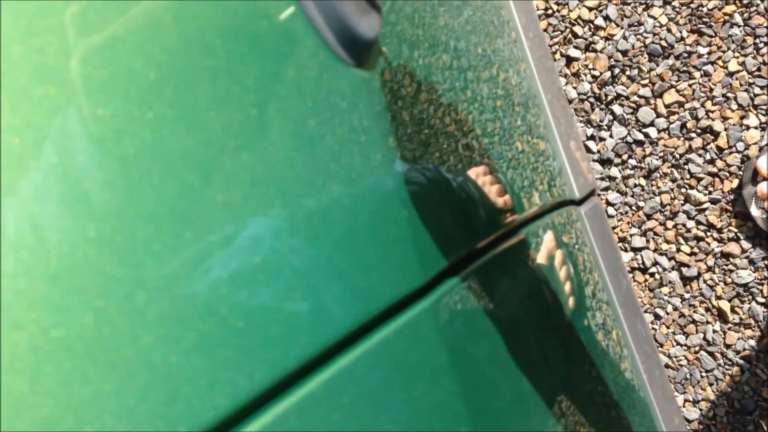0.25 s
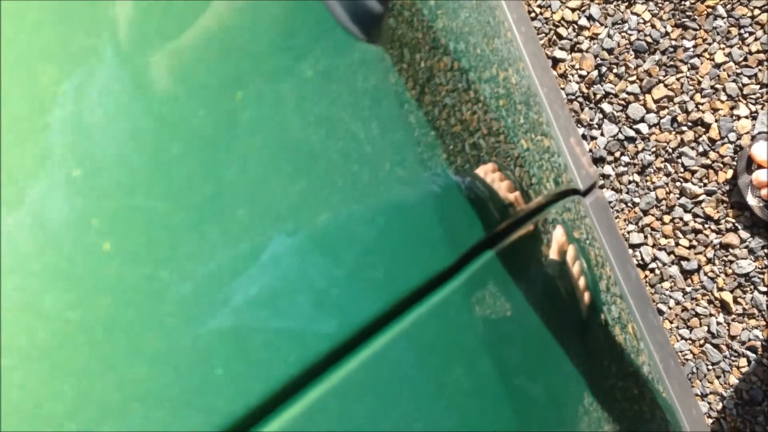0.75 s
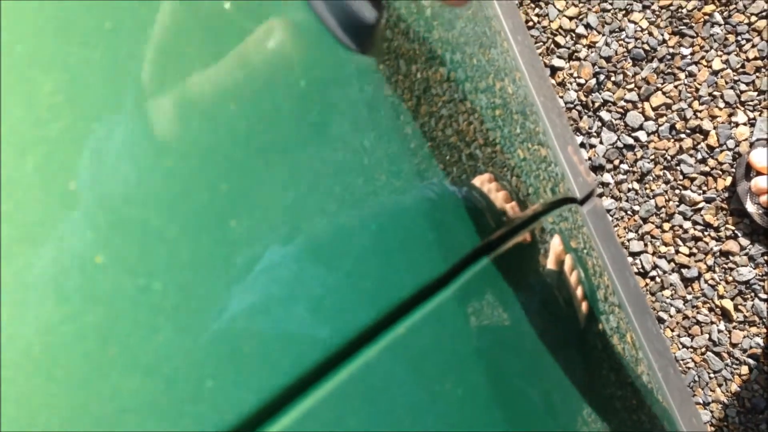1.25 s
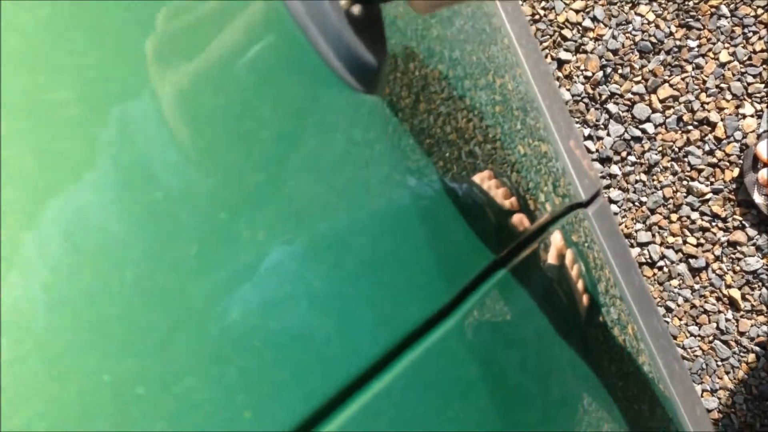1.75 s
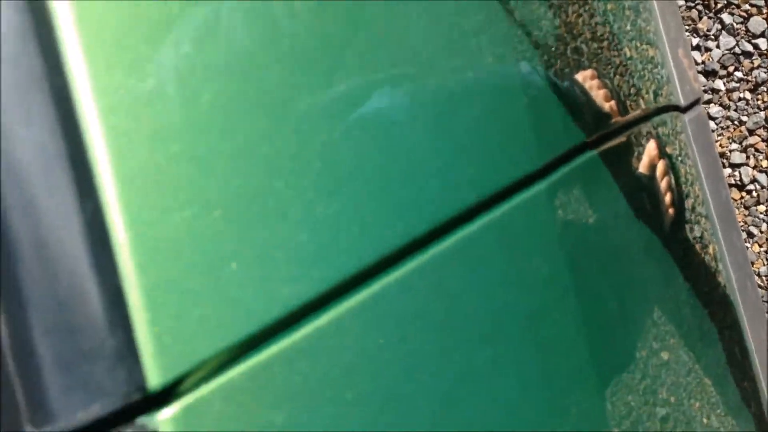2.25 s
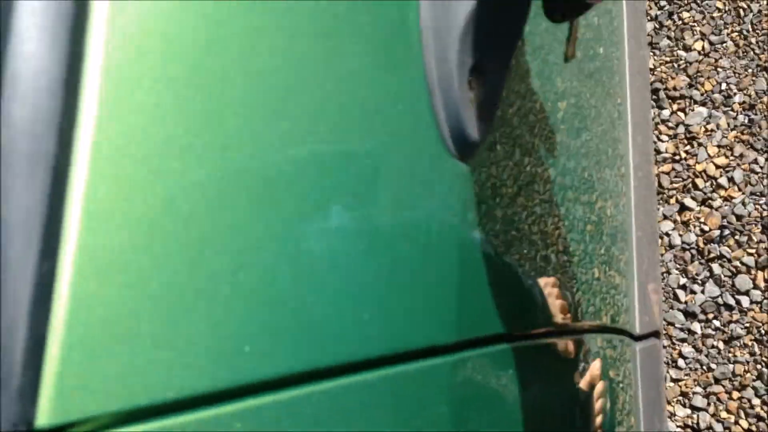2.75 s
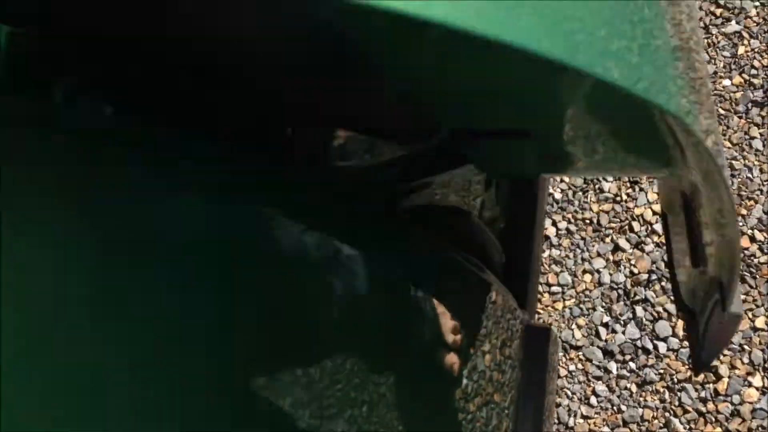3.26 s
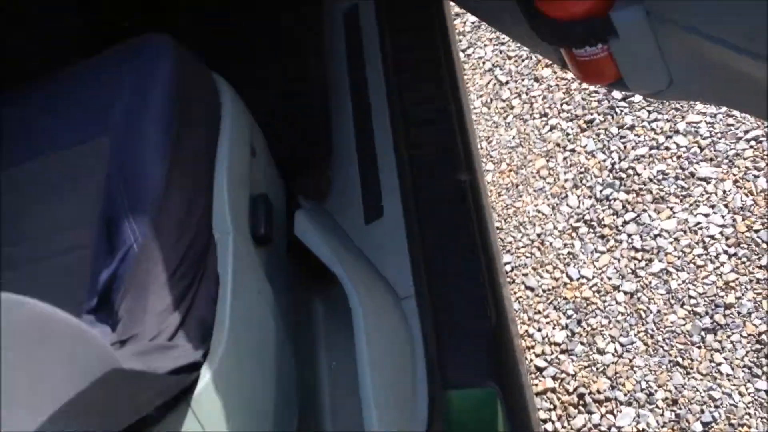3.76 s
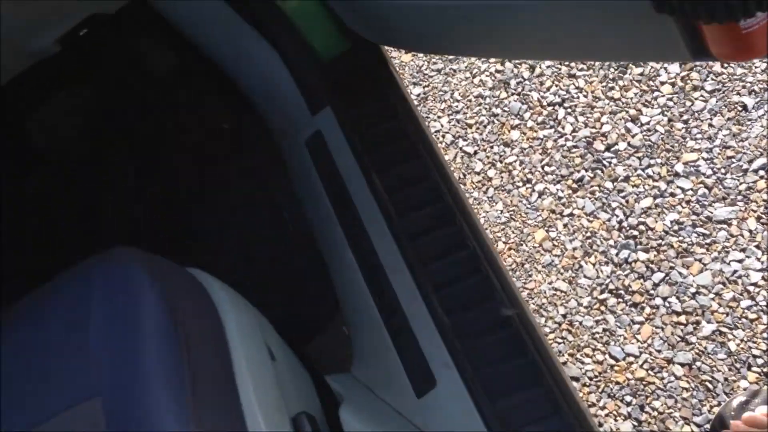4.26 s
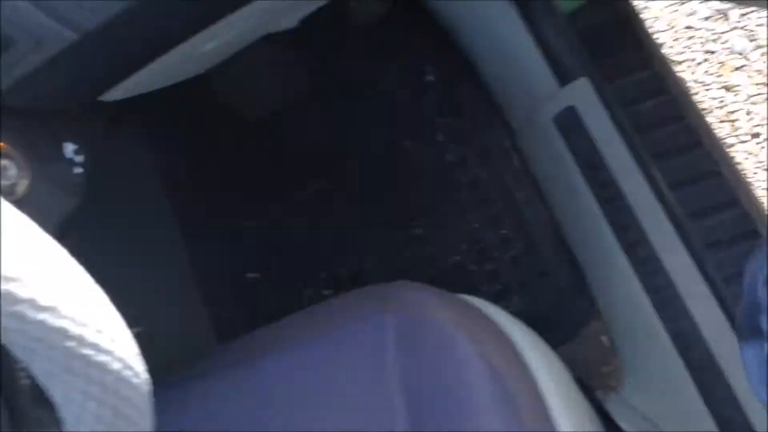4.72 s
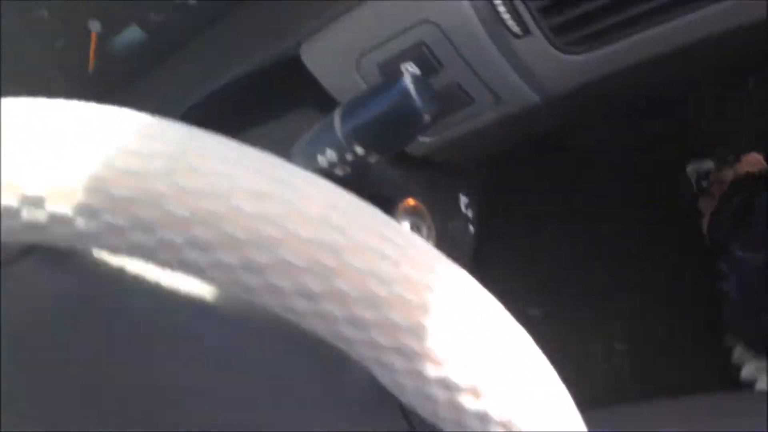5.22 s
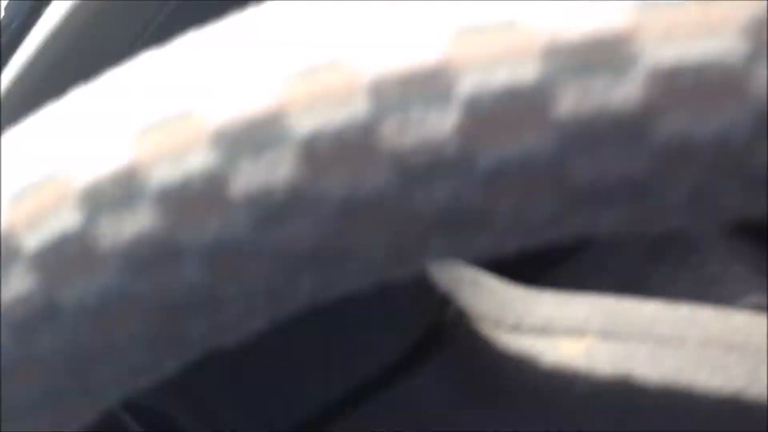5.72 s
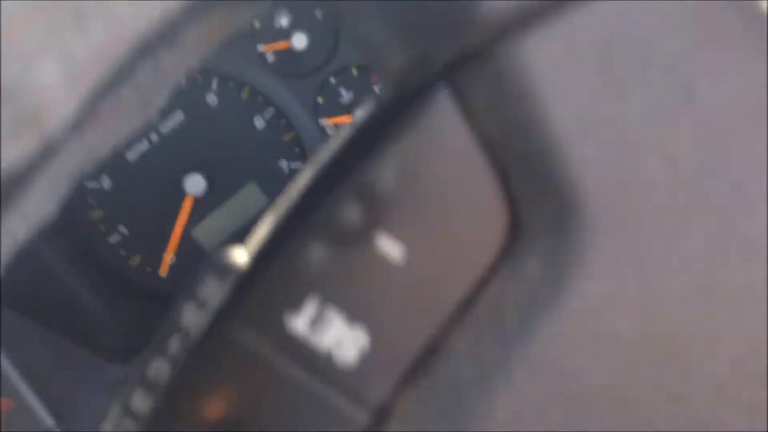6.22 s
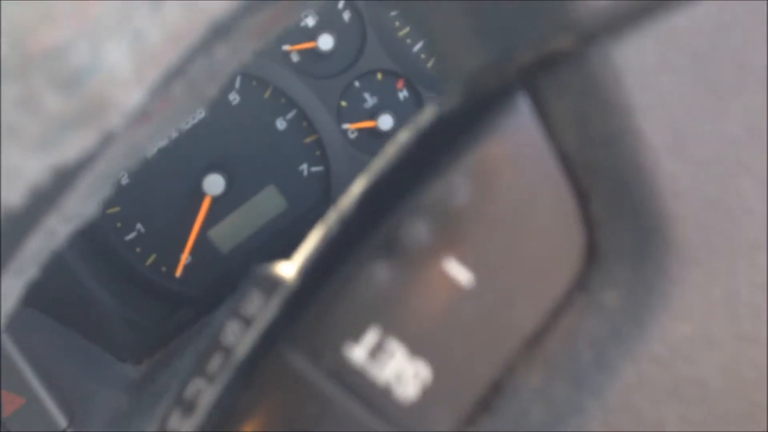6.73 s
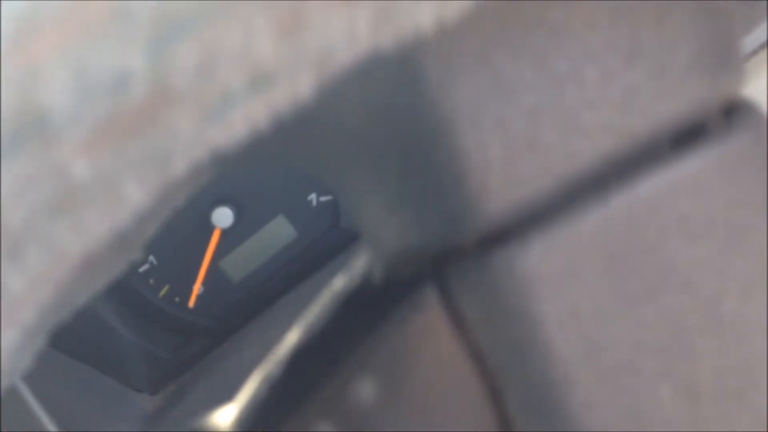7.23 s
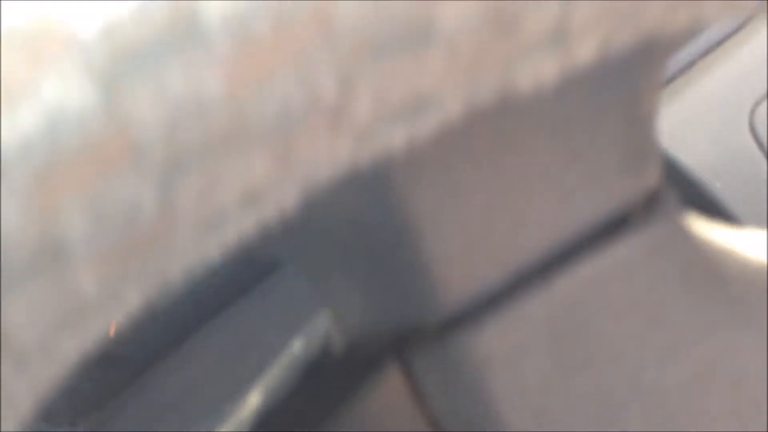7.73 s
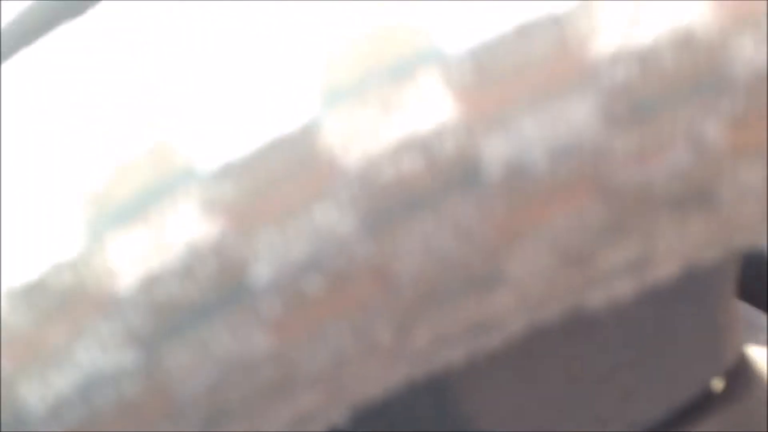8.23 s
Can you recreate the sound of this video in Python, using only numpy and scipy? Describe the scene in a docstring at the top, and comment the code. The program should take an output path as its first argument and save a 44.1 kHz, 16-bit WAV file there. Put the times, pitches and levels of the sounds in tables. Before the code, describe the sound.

A key grinds and clicks in a car door lock, the latch releases with a heavy thump, then clothes rustle and hollow plastic knocks inside.

```python
"""A car door lock close to the microphone: a key grinds and clicks, its ring jangling, in a small car outdoors.
The handle is pulled and the latch lets the door go with a heavy thump; its stay rasps as it swings.
Someone slides onto the seat with rustling clothes and soft thuds; hollow plastic knocks follow in the cabin.
Blows excite ringing modes and coloured noise bursts, and sliding is stick-slip clicks over hiss;
behind them lie a distant outdoor rumble and a smooth hiss, quieter inside the cabin."""
import sys
import numpy as np
from scipy import signal
from scipy.fft import rfft, irfft
from scipy.io import wavfile
from scipy.ndimage import uniform_filter1d, map_coordinates

SR = 44100
rng = np.random.default_rng(int(sys.argv[2]) if len(sys.argv) > 2 else 0)


def unload_audio(sound):
    """Save the sound as a 16-bit wav file, at the path given as the first command line argument."""
    columns = np.transpose(np.atleast_2d(sound))
    # keep every value between -1 and 1, then stretch to whole-number steps
    steps = np.round(np.clip(columns, -1, 1) * 32767)
    wavfile.write(sys.argv[1], SR, steps.astype(np.int16))


N = 373968
TOP_HZ = 15400  # upper limit of the recorder


def undb(db):
    """Turn dB into an amplitude factor."""
    return 10 ** (np.asarray(db) / 20)


def clock(seconds):
    """Sample times from zero, in seconds."""
    return np.arange(int(seconds * SR)) / SR


def unit(x):
    """Scale to unit energy."""
    return x / np.sqrt(np.sum(x ** 2) + 1e-18)


def level(x, db, size=220):
    """Bring the loudest stretch of `size` samples to an RMS level in dB."""
    loudest = uniform_filter1d(x ** 2, size).max()
    return x * undb(db) / np.sqrt(loudest + 1e-18)


def add(track, s, x):
    """Mix a sound in at a time in seconds."""
    i = max(int(s * SR), 0)
    track[i:i + len(x)] += x[:max(N - i, 0)]


def colour(x, points, size=4096):
    """Causal minimum-phase filter through (Hz, dB) points."""
    hz, db = np.transpose(points)
    f = np.maximum(np.arange(size // 2 + 1) * SR / size, 1)
    gain_db = np.interp(np.log(f), np.log(hz), db)
    # folding the cepstrum onto positive times makes the filter causal
    cepstrum = irfft(np.log(undb(gain_db)))
    cepstrum[1:size // 2] *= 2
    cepstrum[size // 2 + 1:] = 0
    response = irfft(np.exp(rfft(cepstrum)))
    return signal.fftconvolve(x, response)[:len(x)]


def high_pass(x, hz):
    """Remove what lies below a frequency."""
    return signal.sosfilt(signal.butter(3, hz, "high", fs=SR, output="sos"), x)


def fade(t, t60):
    """Exponential decay that falls 60 dB in t60 seconds."""
    return np.exp(-np.log(1000) * t / t60)


def burst(t, crack_t60, tail_t60, tail_db):
    """A sharp contact and the diffuse tail after it; tail_db is the tail's energy against the crack's."""
    crack = unit(rng.standard_normal(len(t)) * fade(t, crack_t60))
    tail = unit(rng.standard_normal(len(t)) * fade(t, tail_t60))
    return crack + undb(tail_db) * tail


def ring(t, modes, patchy_db, detune=0):
    """Decaying modes; each contact point weights them differently."""
    hz, db, t60 = np.transpose(modes)[:, :, None]
    weight, shift = rng.standard_normal((2, len(modes), 1))
    sign = (-1) ** np.arange(len(modes))[:, None]
    strength = sign * undb(db + patchy_db * weight)
    swing = np.sin(2 * np.pi * hz * (1 + detune * shift) * t)
    return unit(np.sum(strength * fade(t, t60) * swing, axis=0))


def push(x, ms):
    """A soft contact spreads a blow over a half sine and dulls it."""
    t = clock(max(ms, .2) / 1000)
    return signal.fftconvolve(x, np.sin(np.pi * t / t[-1]))[:len(x)]


def friction(rise, fall, slips_per_s, slip_db, judder_db):
    """Uneven stick-slip clicks over fine hiss; the swell is 20 dB down `rise` s before and `fall` s after its peak."""
    t = clock(2 * (rise + fall)) - 2 * rise
    swell = 10 ** -(np.abs(t / np.where(t < 0, rise, fall)) ** 1.6)
    slips = (rng.random(len(t)) < slips_per_s / SR) * rng.standard_normal(len(t))
    # the grip tightens and eases every few milliseconds
    grips = np.arange(t[0], t[-1], .005)
    judder = undb(judder_db * np.interp(t, grips, rng.uniform(-1, 1, len(grips))))
    hiss = unit(rng.standard_normal(len(t)))
    return swell * judder * (hiss + undb(slip_db) * unit(slips))


def wander(x, share=.1, every_s=.018):
    """Let the pitch of a sound drift at random."""
    turns = np.arange(0, len(x), every_s * SR)
    speed = 1 + share * np.interp(np.arange(len(x)), turns, rng.uniform(-0.84, 1, len(turns)))
    return map_coordinates(x, [np.cumsum(speed / speed.mean())])


# Tint of the open air. Each row: frequency in Hz, gain in dB.
AIR_TINT = [(15, -54), (25, -15), (64, -5.5), (173, -5), (227, -9), (445, -19), (1110, -26), (3090, -25.5),
            (15500, -36.5)]
# Background, quieter inside the cabin. Each row: time in seconds, low rumble in dB, hiss in dB.
AMBIENCE_LEVELS = [(0, -56.5, -61.5), (4.1, -55, -58.5), (5.3, -60.5, -58.5), (7.0, -63.5, -65)]


def air():
    """Distant outdoor rumble and a smooth hiss: one coloured noise split at 500 Hz."""
    s, low_db, hiss_db = np.transpose(AMBIENCE_LEVELS)
    noise = colour(rng.standard_normal(N), AIR_TINT)
    low = signal.sosfiltfilt(signal.butter(2, 500, fs=SR, output="sos"), noise)
    hiss = noise - low
    t = np.arange(N) / SR
    rumble = low / low.std() * undb(np.interp(t, s, low_db))
    return rumble + hiss / hiss.std() * undb(np.interp(t, s, hiss_db))


# Low tint of a shifting body. Each row: frequency in Hz, gain in dB.
SHUFFLE_TINT = [(30, -4.5), (70, -7), (170, 1.5), (330, -8.5), (550, -14), (2500, -38)]
# A body shifting against door and seat. Each row: peak in seconds, length in seconds, level in dB.
SHUFFLE_STROKES = [(2.115, 0.11, -46.5), (3.552, 0.11, -44), (3.829, 0.2, -39.5), (3.968, 0.07, -39.5),
                   (4.307, 0.081, -54), (5.412, 0.089, -48), (5.656, .14, -47.5), (5.863, 0.11, -40),
                   (5.992, 0.19, -43.5)]


def shuffles():
    """A body shifting its weight drags in sparse, low slips."""
    out = np.zeros(N)
    for s, length, db in SHUFFLE_STROKES:
        slide = friction(length / 2, length / 2, slips_per_s=98, slip_db=-0.5, judder_db=2.5)
        add(out, s - length, level(colour(slide, SHUFFLE_TINT), db, size=600))
    return out


# Sill and floor pan. Each row: frequency in Hz, level in dB, 60 dB decay in seconds.
FLOOR_MODES = [(120, -1, 0.09), (161.4, -0.5, 0.088), (322.7, -2.5, 0.091), (494, -2, 0.077),
               (718, -6.5, 0.08)]
# Dull tint of the padding. Each row: frequency in Hz, gain in dB.
THUD_TINT = [(25, -12), (140, 2), (300, -6), (700, 3), (1200, -2.5), (4000, -78)]
# Weight landing on sill, floor and seat. Each row: start in seconds, level in dB, contact in ms.
THUD_BLOWS = [(3.567, -24, 2.77), (3.588, -31, 2.1), (3.764, -34.5, 1.33), (3.788, -31.5, 3.53),
              (3.83, -39, 1.3), (3.891, -36, 2.1), (3.929, -29, 1.34), (4.32, -41, 10), (4.653, -44.5, 2.7),
              (5.382, -36.5, 2.6), (5.456, -42, 3.8), (5.607, -39.5, 3.3), (5.842, -33.5, 3.3),
              (5.932, -39.5, 3.2), (6.045, -44, 2.8), (6.363, -46, 4.6)]


def thuds():
    """Weight lands softly: floor modes and padding noise, blurred by the contact time."""
    out, t = np.zeros(N), clock(.3)
    for s, db, ms in THUD_BLOWS:
        # padding gives way gradually under the weight
        give = 1 - np.exp(-t / 0.0035)
        padding = unit(colour(give * burst(t, 0.046, 0.33, -23.0), THUD_TINT))
        floor = ring(t, FLOOR_MODES, patchy_db=4.5, detune=0.071)
        add(out, s, level(push(floor + undb(-0.5) * padding, ms), db, size=300))
    return out


CREAK_HZ, CREAK_JITTER = 600.5, 0.086  # rate of the slips in a knock, and their unevenness as a share


def creak(seconds, count):
    """A short run of uneven slips that ends as the contact comes to rest."""
    gaps = (1 + CREAK_JITTER * rng.standard_normal(count)) / CREAK_HZ
    times = np.cumsum(gaps) - gaps[0]
    strength = np.exp(-(times / seconds) ** 4)
    return np.bincount(np.abs(times * SR).astype(int), strength)


# Hollow trim. Each row: frequency in Hz, level in dB, 60 dB decay in seconds.
TRIM_MODES = [(593.5, 5.5, 0.047), (702, -2.5, 0.091), (807, 4, 0.03), (940, 2.5, 0.062),
              (1114, -5.5, 0.055)]
# Stiff edge of the trim. Each row: frequency in Hz, level in dB, 60 dB decay in seconds.
EDGE_MODES = [(2194, -3.5, 0.098), (2746, 1, 0.04), (3235, 3.5, 0.048)]
# Bright tint of a hard edge. Each row: frequency in Hz, gain in dB.
EDGE_TINT = [(300, -8.5), (750, 0.5), (1020, 5), (1700, -1), (2300, -5), (3200, -5), (4000, -9.5),
             (5200, -13), (9000, -16.5), (15000, -36)]
# Knocks in the cabin. Each row: start in seconds, hollow ring in dB, clatter in dB, drag in ms.
TRIM_KNOCKS = [(5.38, -51, -42, 3), (5.448, -44.5, -38.5, 1.5), (5.61, -50, -36, 1.1),
               (6.604, -47, -48, 2.6), (7.3735, -30, -37, 2.2), (7.385, -37, -49.5, 3.4),
               (7.451, -52.5, -69, 13), (7.719, -45.5, -59, 2.2), (7.756, -43, -50.5, 2),
               (7.84, -30, -54.5, 2.5), (7.877, -40, -64, 19), (7.901, -27, -44, 12.2),
               (7.942, -48, -68, 9.2), (7.962, -35.5, -52.5, 5.4), (8.167, -66, -38, 1.05),
               (8.465, -58, -41.5, 5)]


def knocks():
    """Creaky slips strike hollow plastic trim: its cavity rings while its edge clatters."""
    out, t = np.zeros(N), clock(.12)
    for s, hollow_db, clatter_db, drag_ms in TRIM_KNOCKS:
        slips = creak(drag_ms / 1000, count=16)
        hollow = signal.fftconvolve(slips, ring(t, TRIM_MODES, patchy_db=4, detune=0.024))
        add(out, s, level(hollow, hollow_db))
        chatter = signal.fftconvolve(slips, fade(t, 0.015) + undb(-5) * fade(t, 0.083))
        clatter = unit(colour(chatter * rng.standard_normal(len(chatter)), EDGE_TINT))
        edge = unit(signal.fftconvolve(slips, ring(t, EDGE_MODES, patchy_db=-3.5, detune=0.024)))
        add(out, s, level(clatter + undb(-5.5) * edge, clatter_db, size=130))
    return out


# A key on metal. Each row: frequency in Hz, level in dB, 60 dB decay in seconds.
CLINK_MODES = [(3920, 1, 0.051), (4064, -9.5, .1), (5770, -10.5, 0.062)]
# Clinks by the steering column. Each row: start in seconds, level in dB.
KEY_CLINKS = [(6.6051, -46), (6.618, -54)]


def clinks():
    """A key clinks on metal by the steering column: a few clear modes and a faint click."""
    out, t = np.zeros(N), clock(.12)
    for s, db in KEY_CLINKS:
        modes = ring(t, CLINK_MODES, patchy_db=0.0)
        click = unit(colour(burst(t, 0.008, 0.04, -14), STEEL_TINT))
        add(out, s, level(modes + undb(-9) * click, db, size=130))
    return out


# Soft tint of loose fabric. Each row: frequency in Hz, gain in dB.
SWISH_TINT = [(150, -2.5), (500, -1.5), (1500, -2), (3500, -6), (8000, -10.5), (15000, -24.5)]
# Broad soft swish of fabric. Each row: peak in seconds, length in seconds, level in dB.
SWISH_STROKES = [(2.907, 0.68, -60.5), (3.329, 0.22, -45.5), (4.934, .38, -47)]


def swishes():
    """Loose fabric brushes past in fine, dense slips that blend into hiss."""
    out = np.zeros(N)
    for s, length, db in SWISH_STROKES:
        rise = 0.55 * length
        slide = friction(rise, length - rise, slips_per_s=1100, slip_db=-19.5, judder_db=5)
        add(out, s - 2 * rise, level(colour(slide, SWISH_TINT), db, size=1500))
    return out


# Rasp of rubbed cloth. Each row: multiple of its pitch, gain in dB.
CLOTH_RASP = [(.15, -7.5), (.45, -5.5), (.9, 2), (1.05, 1), (1.5, -3.5), (2.1, -13.5), (4.5, -24), (9, -47)]
# Clothes rubbing on door and seat. Each row: peak in seconds, length in seconds, level in dB, pitch in Hz.
CLOTH_RUBS = [(0.062, 0.038, -48.5, 1470), (0.31, 0.017, -43.5, 1440), (3.838, 0.043, -44, 1460),
              (4.458, 0.061, -43.5, 2280), (4.484, 0.019, -39, 2000), (4.559, 0.051, -46.5, 2130),
              (4.607, 0.085, -50, 2400), (4.802, 0.033, -48.5, 1090), (5.645, .1, -51, 2420),
              (5.728, 0.11, -38, 1880), (5.753, 0.046, -29, 1700), (6.216, 0.14, -44.5, 2180)]


def rubs():
    """Cloth catches and slips; each rub has its own rasp pitch."""
    out, t = np.zeros(N), clock(.1)
    for s, length, db, hz in CLOTH_RUBS:
        rise = .52 * length  # time spent gathering speed
        slide = friction(rise, length - rise, slips_per_s=770, slip_db=1.5, judder_db=-3)
        # each slip sets the fold of cloth crackling for a moment
        fold = colour(burst(t, 0.0087, 0.04, -5), np.array(CLOTH_RASP) * [hz, 1])
        add(out, s - 2 * rise, level(wander(signal.fftconvolve(slide, fold)), db, size=300))
    return out


# Taut cloth snagging. Each row: start in seconds, level in dB, pitch in Hz.
CLOTH_SNAGS = [(3.762, -44.5, 1650), (3.885, -44, 1490), (4.418, -43, 2040), (4.5436, -33, 2440),
               (5.769, -30, 1800)]


def snags():
    """Taut cloth snaps free with a short burst of its rasp."""
    out, t = np.zeros(N), clock(.1)
    for s, db, hz in CLOTH_SNAGS:
        snap = rng.standard_normal(len(t)) * fade(t, 0.064)
        add(out, s, level(colour(snap, np.array(CLOTH_RASP) * [hz, 1]), db, size=130))
    return out


# Tick of a key. Each row: multiple of its pitch, gain in dB.
KEY_TICK = [(.15, -26), (.5, -4), (1.05, 3.5), (1.6, -11.5), (3, -13.5)]
# Clearest touches of the keys on their ring. Each row: start in seconds, level in dB, pitch in Hz.
KEY_TOUCHES = [(0.94, -41, 4770), (0.996, -27, 6460), (1.1, -28.5, 3530), (1.121, -37.5, 3850),
               (1.355, -27.5, 4600), (1.395, -39, 5100), (1.422, -32.5, 5040), (1.442, -37, 10500),
               (1.6926, -32.5, 8100), (1.813, -41, 3460), (1.835, -38, 6500), (1.873, -38, 5800),
               (1.9082, -38.5, 8300), (2.294, -28, 7400), (2.439, -44, 3320), (2.5453, -39, 6340),
               (2.948, -39.5, 3120), (6.35, -41, 7200)]


def keys():
    """Keys tap each other and the handle: a tick, a few damped overtones, a little of the lock frame."""
    out, t = np.zeros(N), clock(.1)
    for s, db, hz in KEY_TOUCHES:
        overtones = [(hz, 0, .018), (hz * 1.17, -2, .015), (min(hz * 1.55, TOP_HZ), -3, .03)]
        chink = undb(-5) * ring(t, overtones, patchy_db=3)
        tick = unit(colour(burst(t, 0.0044, 0.08, -9), np.array(KEY_TICK) * [hz, 1]))
        clack = undb(-12.5) * frame()[:len(t)]
        add(out, s, level(tick + chink + clack, db, size=60))
    return out


# Door stay. Each row: frequency in Hz, level in dB, 60 dB decay in seconds.
STAY_MODES = [(1100, -0.5, 0.015), (1380, 1, 0.015), (1693, -2, 0.017), (2490, -10, .016),
              (3300, -10, .012), (4160, -15, 0.0083)]
# Hiss of its sliding faces. Each row: frequency in Hz, gain in dB.
STAY_TINT = [(300, -10.5), (1000, 5), (4400, 0.5), (8000, -12.5), (15000, -33)]


def stay_slip(hiss_db):
    """One slip of the stay: short modes, with its hiss set in dB against their ring."""
    t = clock(.06)
    hiss = unit(colour(burst(t, 0.0033, 0.07, -8.5), STAY_TINT))
    return ring(t, STAY_MODES, patchy_db=1.5, detune=0.035) + undb(hiss_db) * hiss


# Strokes as the door swings open. Each row: peak in seconds, length in seconds, level in dB,
# hiss against the ring in dB.
STAY_SCRAPES = [(3.287, .14, -48, -8), (3.38, .06, -30, 7), (3.41, .08, -39, -11), (3.506, .09, -38.5, -7),
                (3.534, .025, -35, -4.5), (3.561, 0.041, -32, -11), (3.587, 0.055, -28.5, -1)]
# The stay catching and slipping. Each row: start in seconds, level in dB.
STAY_JERKS = [(3.362, -32), (3.5391, -30), (3.573, -25.5), (3.599, -28)]


def stay():
    """The door stay rasps through its guide in a dense run of slips, with a few harder jerks."""
    out = np.zeros(N)
    for s, length, db, hiss_db in STAY_SCRAPES:
        slide = friction(length / 2, length / 2, slips_per_s=900, slip_db=4.5, judder_db=1)
        add(out, s - length, level(signal.fftconvolve(slide, stay_slip(hiss_db)), db, size=400))
    for s, db in STAY_JERKS:
        add(out, s, level(stay_slip(hiss_db=-10), db, size=130))
    return out


# Door skin and cavity. Each row: frequency in Hz, level in dB, 60 dB decay in seconds.
PANEL_MODES = [(52.2, -20, 0.4), (100.3, -8, 0.5), (129.2, -8, 0.27), (152, -1.5, 0.19),
               (175.2, -0.5, 0.34), (205.3, -5, 0.46), (242.6, -6, 0.42), (272, -12.5, 0.15),
               (286.5, -6.5, 0.32), (353.5, 3.5, 0.16), (400, -4.5, 0.077), (458, -13, 0.11),
               (570, -23, 0.11)]
# Its dense overtones. Each row: frequency in Hz, gain in dB.
PANEL_TINT = [(50, -20), (110, -15), (170, 3), (350, 0), (550, -9), (800, -18), (2000, -46)]


def panel():
    """The door skin booms when anything inside it moves; small parts hardly stir its deepest modes."""
    t = clock(.45)
    skin = high_pass(ring(t, PANEL_MODES, patchy_db=3.5, detune=0.0094), hz=127)
    return skin + undb(-2.5) * unit(colour(burst(t, 0.11, 0.54, -4.5), PANEL_TINT))


# The seal letting go in three jerks. Each row: start in seconds, level in dB, swing of the panel in Hz.
THUMP_JERKS = [(3.0519, -4.5, 153), (3.0675, -7, 226), (3.0852, -11, 176)]


def door():
    """The seal lets go: the whole panel is shoved, rebounds and rings down."""
    out, t = np.zeros(N), clock(.9)
    for s, db, hz in THUMP_JERKS:
        # the panel's heavily damped bulge builds over its first cycle and carries the first swings
        build = 1 - np.exp(-2 * hz * t)
        bulge = unit(np.sin(2 * np.pi * hz * t) * fade(t, 0.052) * build)
        modes = undb(-9.0) * ring(t, PANEL_MODES, patchy_db=1.0)
        shudder = undb(-4.5) * unit(colour(burst(t, 0.093, 0.46, -23.5), PANEL_TINT))
        add(out, s, level(push(bulge + modes + shudder, ms=0.83), db, size=300))
    return out


# Steel frame around the lock. Each row: frequency in Hz, level in dB, 60 dB decay in seconds.
FRAME_MODES = [(560, -1, 0.06), (841, -5.5, 0.1), (934, 2, 0.068), (1030.5, -0.5, 0.095), (1199, 5, 0.035),
               (1315, -14, 0.12), (1503, -5, 0.11), (1620, -11.5, 0.064), (2340, -10, 0.043),
               (2530, -18, 0.026)]
# Its dense overtones. Each row: frequency in Hz, gain in dB.
FRAME_TINT = [(250, -21), (700, -9), (950, 1), (1500, -4.5), (2000, -8.5), (3500, -12.5), (6000, -24),
              (12000, -43)]


def frame():
    """The lock frame gives a short ringing clack."""
    t = clock(.2)
    modes = undb(-1) * ring(t, FRAME_MODES, patchy_db=3, detune=.008)
    return modes + unit(colour(burst(t, 0.033, 0.092, -1.9), FRAME_TINT))


# Small lock parts. Each row: frequency in Hz, level in dB, 60 dB decay in seconds.
STEEL_MODES = [(4220, -4, 0.067), (5410, -15, 0.15), (6700, -10.5, 0.043), (8260, 7.5, 0.006),
               (9340, 5.5, 0.027), (9270, -11.5, 0.03)]
# Their dense overtones. Each row: frequency in Hz, gain in dB.
STEEL_TINT = [(800, -30), (3000, -0.5), (5500, -1.5), (7300, 0.5), (8700, -13.5), (10500, -3), (12000, -10),
              (15000, -20)]


def steel():
    """Small hard parts click and ring very briefly."""
    t = clock(.1)
    parts = ring(t, STEEL_MODES, patchy_db=3, detune=.005)
    return undb(-9.0) * parts + unit(colour(burst(t, 0.0088, 0.09, -11), STEEL_TINT))


# The striker bar. Each row: frequency in Hz, level in dB, 60 dB decay in seconds.
STRIKER_MODES = [(1174, -3, 0.054), (2267, 1.5, 0.058), (2492, 2.5, 0.043), (2800, -8.5, 0.055),
                 (3890, -12.5, .03)]
CLAW_S, CLAW_DB = 3.038, -32.5  # start and level of the crunch
STRIKER_S, STRIKER_DB = 3.104, -23.5  # start and level of the free ring


def striker():
    """The latch claw crunches along the striker bar, then slips off and leaves it ringing."""
    out, t = np.zeros(N), clock(.1)
    add(out, STRIKER_S, level(ring(t, STRIKER_MODES, patchy_db=-1.5), STRIKER_DB, size=130))
    claw = friction(0.011, 0.048, slips_per_s=370, slip_db=5, judder_db=3)
    rough = unit(colour(burst(t, 0.0032, 0.032, -8.5), EDGE_TINT))
    bar = ring(t, STRIKER_MODES, patchy_db=5.5) + rough
    add(out, CLAW_S, level(signal.fftconvolve(claw, bar), CLAW_DB, size=400))
    return out


# Strokes of key and linkage sliding. Each row: peak in seconds, length in seconds, force in dB.
GRIND_STROKES = [(0.58, 0.072, -49), (0.668, 0.056, -35.5), (0.782, 0.065, -48.5), (0.965, 0.09, -52.5),
                 (1.182, 0.048, -20.5), (1.258, 0.088, -42.5), (1.347, 0.056, -37.5), (1.414, 0.044, -32.5),
                 (1.466, 0.047, -44), (1.618, 0.072, -37), (1.81, 0.11, -47), (2.09, 0.065, -47.5),
                 (2.275, 0.066, -57.5), (3.02, 0.071, -50), (3.079, 0.047, -34)]
GRIND_RISE_SHARE, GRIND_STEEL_DB = .46, -11  # part of a stroke spent pressing harder; steel against the force
GRIND_BOOM_DB, GRIND_BOOM_SLOPE = -12, 0.53  # door panel: dB at full force, dB per dB of force


def grinds():
    """Each slide sounds in the steel parts, their frame and the door panel."""
    out = np.zeros(N)
    for s, length, db in GRIND_STROKES:
        rise = GRIND_RISE_SHARE * length
        slide = friction(rise, length - rise, slips_per_s=430, slip_db=12.0, judder_db=9.5)
        boom_db = GRIND_BOOM_DB + GRIND_BOOM_SLOPE * db
        for part, part_db in ((steel, db + GRIND_STEEL_DB), (frame, db), (panel, boom_db)):
            add(out, s - 2 * rise, level(signal.fftconvolve(slide, part()), part_db, size=400))
    return out


# Blows of key, lock and latch. Each row: start in seconds, clack of the frame in dB,
# steel click above the clack in dB.
LOCK_BLOWS = [(0.328, -40.5, 5.5), (0.339, -47, 10), (0.5298, -43.5, 5), (0.57, -43.5, -12),
              (0.674, -20.5, 1.5), (0.803, -42.5, -13), (0.8988, -40.5, 6.5), (0.9061, -21, -31),
              (1.156, -31, -13.5), (1.1698, -21, 0), (1.178, -17, -2), (1.197, -24, -13), (1.211, -32.5, 1),
              (1.256, -44.5, 13), (1.356, -29.5, -19), (1.396, -50.5, -14), (1.411, -47, -12),
              (1.421, -37.5, -18), (1.57, -36, -12), (1.576, -36.5, -23), (1.585, -35, 5.5),
              (1.595, -25.5, -17), (1.6, -37, -18), (1.6093, -25, -17), (1.624, -30, -19),
              (1.6443, -28, -7.5), (1.649, -38, -7), (1.6877, -42, 0), (1.788, -46, 18.5),
              (2.271, -47.5, 9.5), (2.9812, -42.5, 4.5), (3.0021, -36, -5), (3.006, -43.5, -20),
              (3.055, -32, -14.5), (3.063, -27, -13), (3.081, -28.5, -12), (3.088, -32.5, -12.5),
              (3.1036, -29, 7.5), (3.107, -29, 6)]
BOUNCE_S, BOUNCE_DB = 0.0047, -7  # loose parts strike once more after each blow
BLOW_BOOM_DB, BLOW_BOOM_SLOPE = -9.5, 0.73  # door panel: dB at full force, dB per dB of force
# a small spring zings with each steel click: pitch, decay, dB at a full click, dB per dB of click
SPRING_HZ, SPRING_T60_S, SPRING_DB, SPRING_SLOPE = 8810, 0.0093, 16.5, 1.69


def blows():
    """Each blow sounds in steel, frame and spring, and the door panel answers even a light touch."""
    out, t = np.zeros(N), clock(.1)
    zing = np.sin(2 * np.pi * SPRING_HZ * t) * fade(t, SPRING_T60_S)
    for s, db, click_db in LOCK_BLOWS:
        for late, loss in ((0, 0), (BOUNCE_S, BOUNCE_DB)):
            add(out, s + late, level(steel(), db + click_db + loss, size=60))
            add(out, s + late, level(frame(), db + loss, size=130))
        add(out, s, level(panel(), BLOW_BOOM_DB + BLOW_BOOM_SLOPE * db, size=300))
        add(out, s, level(zing, SPRING_DB + SPRING_SLOPE * (db + click_db), size=60))
    return out


def scene():
    """Outdoor air behind, the cabin and clothes, then door and lock close to the microphone."""
    cabin = shuffles() + thuds() + knocks() + clinks()
    clothes = swishes() + rubs() + snags()
    lock = striker() + grinds() + blows()
    return (air() + cabin + clothes + keys() + stay() + door() + lock)[None]


def record(dry):
    """The microphone thins the deepest bass and rounds the loudest peaks; the recorder cuts the top."""
    thin = signal.sosfilt(signal.butter(2, 35, "high", fs=SR, output="sos"), dry)
    rounded = np.tanh(thin)
    return signal.sosfilt(signal.ellip(8, .2, 70, TOP_HZ, fs=SR, output="sos"), rounded)


dry = scene()
out = record(dry)
unload_audio(out)
```